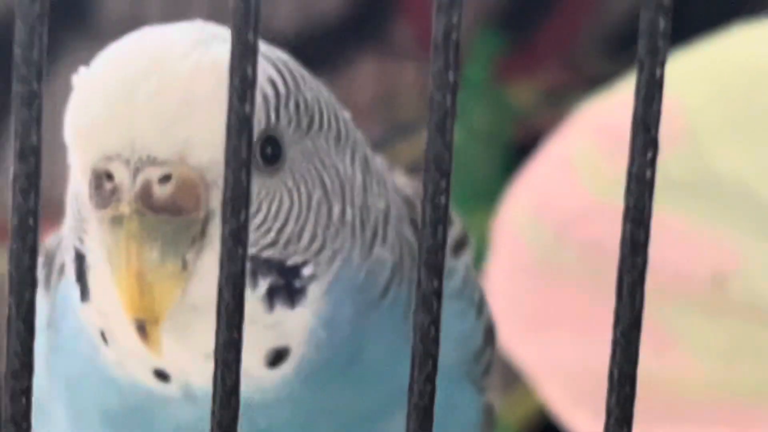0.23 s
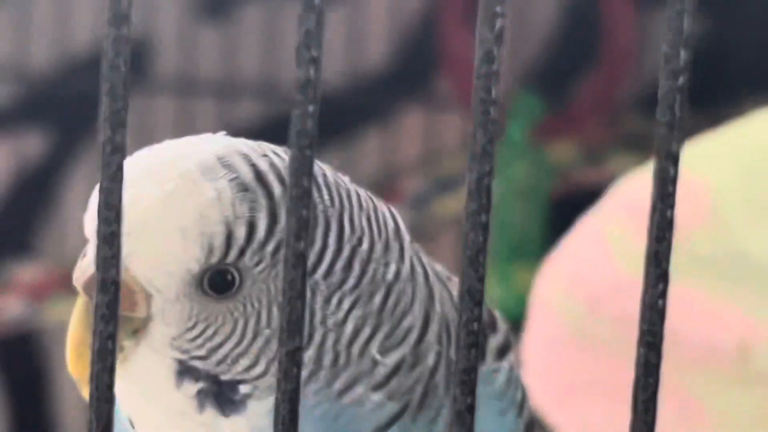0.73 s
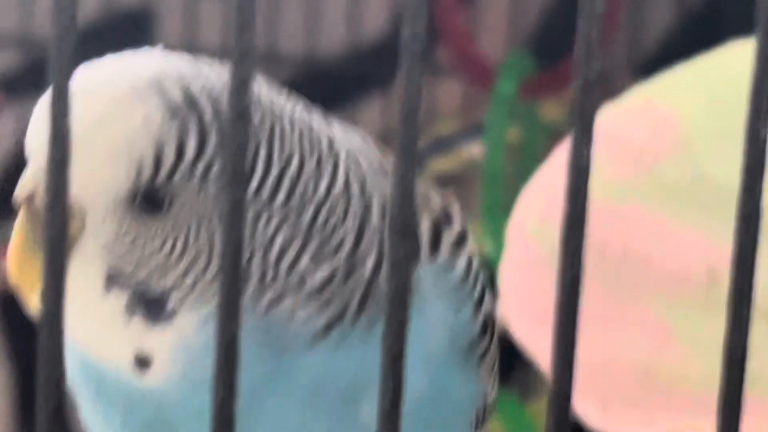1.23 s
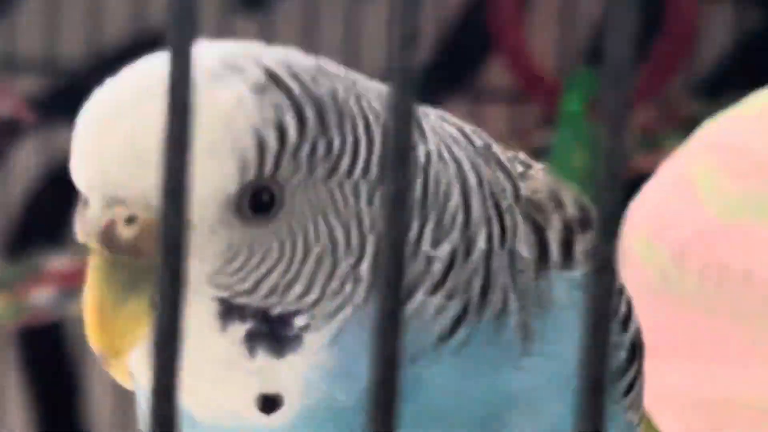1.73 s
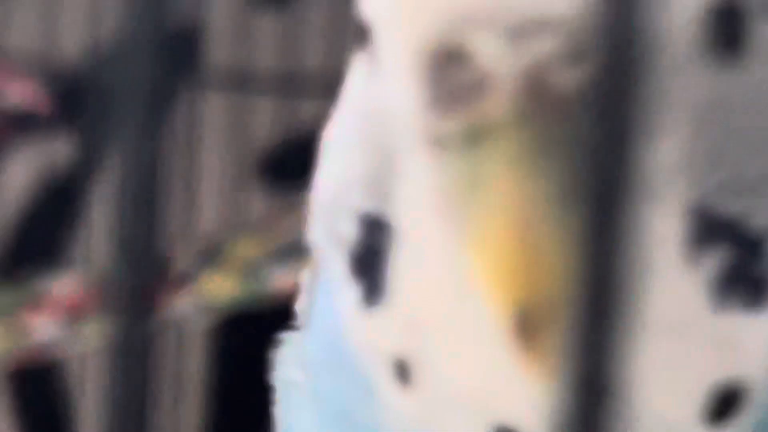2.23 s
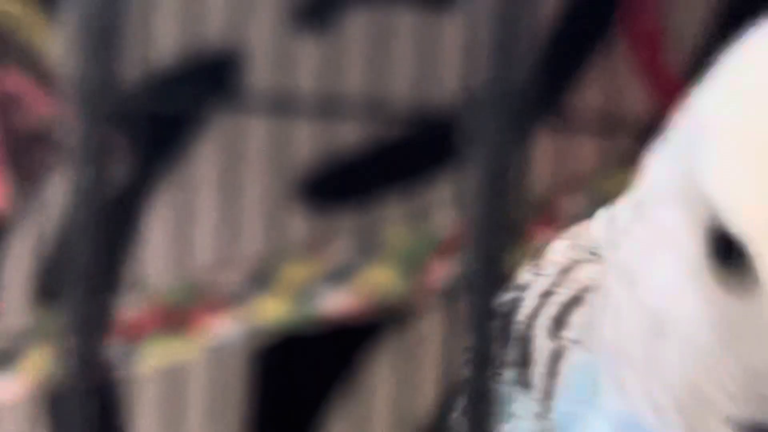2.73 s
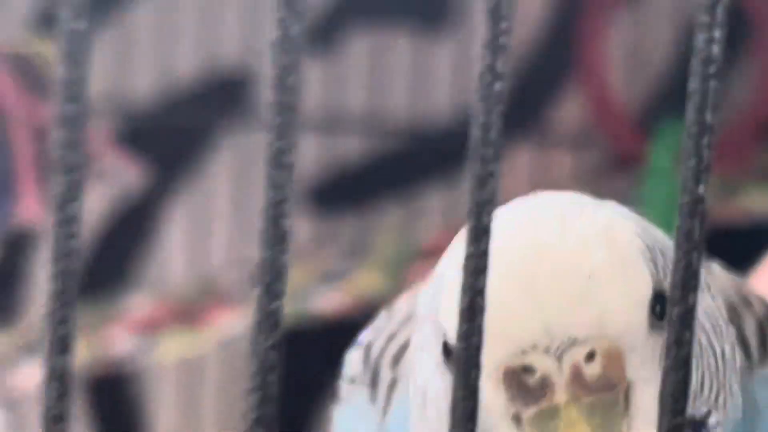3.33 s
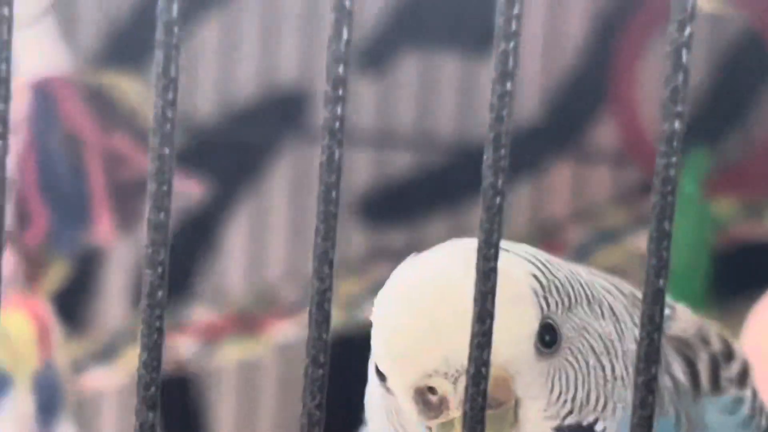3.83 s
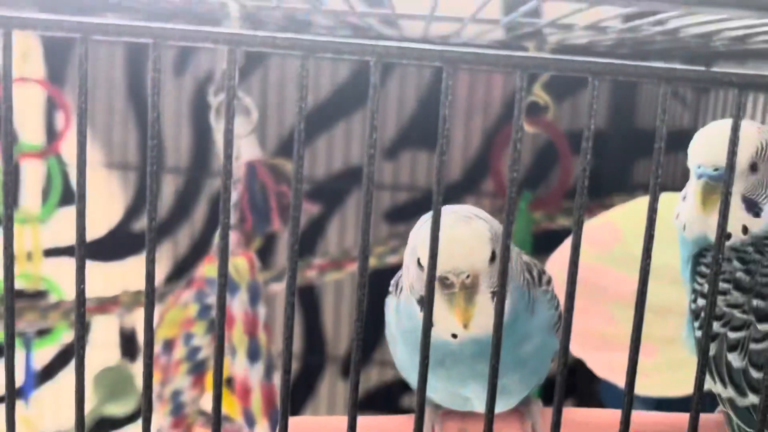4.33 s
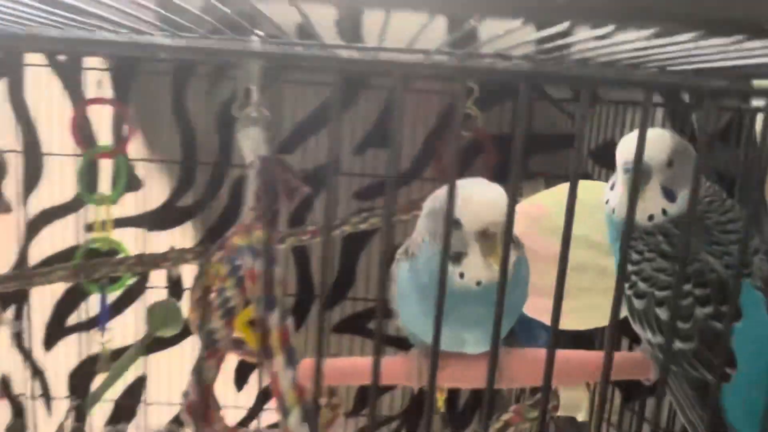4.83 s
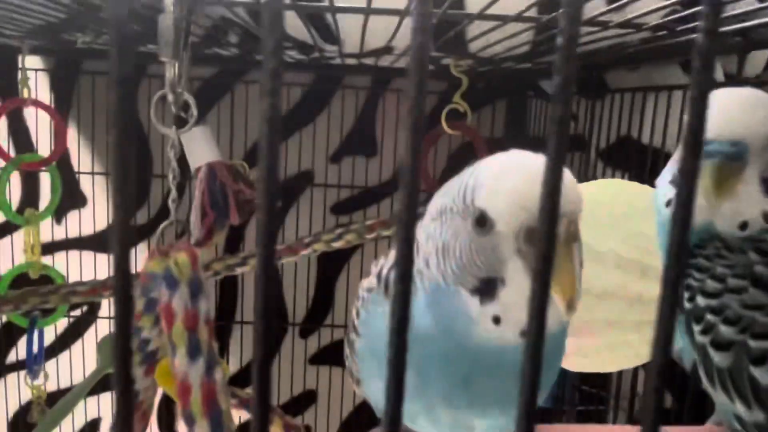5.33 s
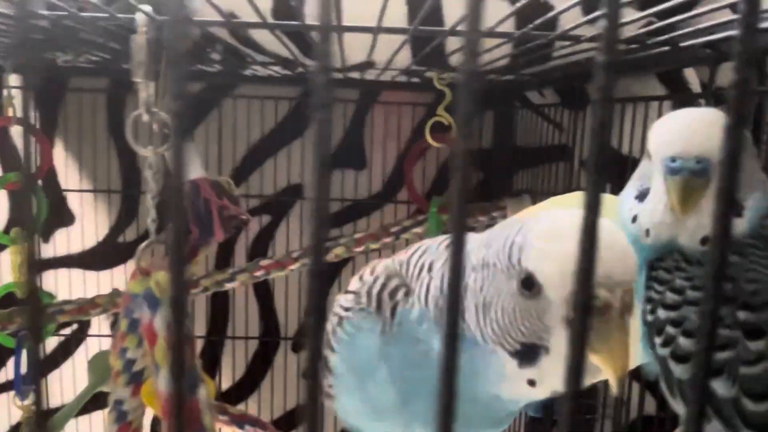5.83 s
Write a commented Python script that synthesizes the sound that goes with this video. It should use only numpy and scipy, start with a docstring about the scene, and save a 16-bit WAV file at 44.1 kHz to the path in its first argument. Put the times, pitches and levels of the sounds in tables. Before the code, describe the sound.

Close to a wire cage in a quiet room, one budgerigar gives loud, rapidly sliding chirps while another sounds fainter and more reverberant behind. The song sinks into low mutters, tiny croaks and beak clicks with a dull bump, then a second bright burst comes near four seconds. Sparse rustles, a faint squawk and a thin wire ring finish it. A nearby stereo microphone also catches low room rumble.

```python
"""A quiet room with a wire cage: two budgerigars warble, one right at the bars, one farther back. Their song is
a string of fast whistled glides, each bird one gliding tone with overtones, some of it fluttered into buzzes.
Pulses ringing the throat make soft croaks and beak clicks; noise makes raspy hisses. A few dull decaying thumps
sound and a wire rings faintly, over rustling and the room's low rumble. Cage and room reflect both birds, the
far one more strongly, into a pair of microphones."""
import sys
import numpy as np
from scipy import signal
from scipy.fft import rfft, irfft, next_fast_len
from scipy.io import wavfile
from scipy.ndimage import uniform_filter1d, map_coordinates

SR = 44100
rng = np.random.default_rng(int(sys.argv[2]) if len(sys.argv) > 2 else 0)


def int16_out(signal):
    """Quantize to a 16-bit WAV file."""
    q = np.round(np.clip(np.atleast_2d(signal).T, -1, 1) * 32767)
    wavfile.write(sys.argv[1], SR, q.astype(np.int16))


N = 268172
TIME = np.arange(N) / SR
SIZE = next_fast_len(N + SR)
FREQS = np.maximum(np.fft.rfftfreq(SIZE, 1 / SR), 1)


def from_db(db):
    """Decibels to gain."""
    return 10 ** (np.asarray(db) / 20)


def rms_one(x):
    """Scale to unit power."""
    return x / np.sqrt(np.mean(x ** 2) + 1e-20)


def at_hz(points, hz):
    """Read a table on a log-frequency axis."""
    table_hz, values = np.transpose(points)
    return np.interp(np.log(hz), np.log(table_hz), values)


def shaped(x, response):
    """Filter by a frequency response."""
    return irfft(rfft(x, SIZE) * response, SIZE)[..., :N]


def noise(colour):
    """Coloured noise of unit power."""
    return rms_one(shaped(rng.standard_normal(N), from_db(at_hz(colour, FREQS))))


def wobble(hz):
    """Random motion up to the given rate, spread 1."""
    return rms_one(shaped(rng.standard_normal(N), 1 / (1 + (FREQS / hz) ** 4)))


def span(start, end):
    """Samples of an event and its progress from 0 to 1."""
    first = int(start * SR)
    at = np.arange(first, min(max(int(end * SR), first + 20), N))
    return at, np.linspace(0, 1, len(at))


def soften(x, seconds):
    """Round the corners of a control by averaging twice."""
    size = max(int(seconds * SR), 1)
    return uniform_filter1d(uniform_filter1d(x, size), size)


# colour of the room's rumble: [f/Hz, level/dB]
RUMBLE_COLOUR = [(25, -5.5), (52, 1.5), (75, -4), (120, -11.5), (200, -13.5), (320, -17), (660, -26),
                 (1100, -34), (2200, -33.5), (4200, -55.5), (7000, -57.5), (10000, -58), (15500, -67)]
# likeness of the room noise at the two microphones: [f/Hz, likeness 0-1]
LIKENESS = [(40, 0.98), (125, 0.93), (300, .7), (1000, 0.8), (10000, 0.96)]


def room_noise(level_db, swell_db):
    """Low rumble of the home, slowly swelling, nearly the same on both sides in the bass."""
    alike = np.clip(at_hz(LIKENESS, FREQS), 0, 1)
    middle = noise(RUMBLE_COLOUR)
    side = shaped(noise(RUMBLE_COLOUR), np.sqrt((1 - alike) / (1 + alike)))
    gain = from_db(level_db + swell_db * wobble(1.3))
    return gain * (middle + side * np.array([[1], [-1]]))


# colour of the rustle: [f/Hz, level/dB]
RUSTLE_COLOUR = [(400, -13.5), (1100, -0.5), (2200, 2), (4000, 0.5), (5500, -4), (7500, -8), (10500, -13),
                 (14500, -25.5), (16000, -30.5)]
# stirs of feathers and feet over a faint steady rustle, levels before the grain: [t/s, peak level/dB]
STIRS = [(.02, -59.5), (.53, -68.5), (1.509, -67), (2.0, -67), (2.8, -64.5), (3.38, -63.5), (4.72, -66.5),
         (5.001, -51.5), (5.39, -67.5), (5.75, -54.5), (5.97, -80)]
STIR_RISE_DB_PER_S, STIR_FALL_DB_PER_S, RUSTLE_DB = 112.5, 125.5, -74.5


def rustle(grain_db):
    """Feathers and feet stir softly all the time, a grainy noise with now and then a swell."""
    gain = from_db(RUSTLE_DB)
    for s, peak_db in STIRS:
        drop_db = np.maximum(STIR_RISE_DB_PER_S * (s - TIME), STIR_FALL_DB_PER_S * (TIME - s))
        gain = gain + from_db(peak_db - drop_db)
    return gain * from_db(grain_db * wobble(60)) * noise(RUSTLE_COLOUR)


def flutter(rows):
    """Swing of the syrinx that chops a whistle into a buzz: its beat and its depth."""
    beat, depth = np.zeros((2, N))
    for start, end, per_s, amount in rows:
        at, _ = span(start, end)
        beat[at] = -np.cos(2 * np.pi * per_s * (TIME[at] - start))
        depth[at] = min(amount, 1)
    return soften(beat * depth, 0.00021), soften(depth, 0.00022)


# strength of the octave overtone, strong in low notes and faint in high ones: [pitch f/Hz, level/dB]
OCTAVE = [(780, 3.5), (1000, 0), (1250, -6.5), (1500, -14), (2000, -23.5), (2500, -29.5), (3000, -30),
          (4000, -26.5)]
# colour of the overtones, read relative to the octave: [f/Hz, level/dB]
OVERTONE_COLOUR = [(1500, 19.5), (2500, 10), (3200, -0.5), (4200, -13), (5500, -24), (7000, -29.5),
                   (8500, -27), (10500, -36), (14500, -36), (16000, -39)]
# colour of the breath let through by a rough voice: [f/Hz, level/dB]
AIR_COLOUR = [(400, -35), (1200, -23.5), (2200, 19.5), (4200, -10.5), (5400, -11), (8500, -19.5),
              (10500, -14.5), (14500, -7), (16000, -27.5)]
# unsteady push of air: its rate, its swing in level and in pitch (share)
PUSH_HZ, PUSH_DB, PUSH_BEND = 87, 1.36, .008
FULL_FALL_HZ = 1800   # below this pitch the higher overtones thin out less and less
BASE_ROUGH = 0.053    # added to the roughness of every note


def whistle(notes, squeezes, flutters, jitter, shimmer, rough_hz, air_db, ease_s, fall_db, bend_hz):
    """One syrinx runs through the notes; roughness shakes its pitch and strength and lets air through."""
    controls = np.zeros((4, N))
    gate, pitch, gain, rough = controls
    for at, note_hz, strength, roughness in notes:
        gate[at], pitch[at], gain[at] = 1, note_hz, strength
        rough[at] = np.clip(roughness, 0, 1)
    gate, pitch, gain, rough = (soften(c, ease_s) for c in controls)
    # dividing by the softened gate keeps pitch and roughness whole at the edges of a note
    pitch = np.maximum(pitch / np.maximum(gate, 1e-6), 300)
    rough = rough / np.maximum(gate, 1e-6) + BASE_ROUGH
    # a low pitch strengthens the octave; a squeeze sets it, strong in a screech, weak in a hollow note
    octave = at_hz(OCTAVE, pitch)
    for start, end, octave_db in squeezes:
        octave[span(start, end)[0]] = octave_db
    octave = soften(octave, ease_s)
    gain = gain / np.hypot(1, from_db(octave))
    # the push of air is never quite steady
    push = wobble(PUSH_HZ)
    gain = gain * from_db(PUSH_DB * push)
    pitch = pitch * (1 + PUSH_BEND * push)
    # each beat of the flutter raises strength and pitch together
    beat, depth = flutter(flutters)
    gain = gain * (1 + beat) / np.sqrt(1 + depth ** 2 / 2)
    gain = gain * (1 + np.tanh(shimmer * rough * wobble(rough_hz)))
    shaken_hz = pitch * (1 + jitter * rough * wobble(rough_hz)) + bend_hz * beat * depth
    phase = 2 * np.pi * np.cumsum(shaken_hz) / SR
    on = np.flatnonzero(gate > 1e-6)
    tone = np.zeros(N)
    tone[on] = np.sin(phase[on])
    # overtones grow together with the octave and are coloured by the throat
    fall_share = np.minimum(pitch[on] / FULL_FALL_HZ, 1)
    for k in range(2, 9):
        hz = k * pitch[on]
        colour_db = at_hz(OVERTONE_COLOUR, hz) - at_hz(OVERTONE_COLOUR, 2 * pitch[on])
        level_db = octave[on] + colour_db - fall_db * np.log2(k / 2) * fall_share
        tone[on] += from_db(level_db) * np.sin(k * phase[on]) * (hz < SR / 2)
    air = from_db(air_db) * rough * noise(AIR_COLOUR)
    return gain * (np.sqrt(2) * tone + air)


NOTE_EDGE = .45   # strength at the ends of a note
ROUGH_AT_HZ, ROUGH_GROWTH = 1500, 0.66   # pitch at which a note's roughness holds; lower notes are rougher


def note(start, end, first_hz, turn_hz, level_db, turn, roughness, lateness=1):
    """A short note swells and fades while its pitch runs along a parabola to a turning point."""
    at, u = span(start, end)
    pitch = turn_hz + (first_hz - turn_hz) * (1 - u / turn) ** 2
    swell = NOTE_EDGE + 0.54 * np.sin(np.pi * u ** lateness)
    slack_rough = roughness * (ROUGH_AT_HZ / turn_hz) ** ROUGH_GROWTH
    return at, pitch, from_db(level_db) * swell, slack_rough


# flutter of the syrinx at the bars: [start t/s, end t/s, beats per s, depth 0-1]
FLUTTERS = [(.3062, .316, 310, .92), (.3445, .358, 250, .7), (.752, .793, 330, .4), (.8555, .897, 166, .92),
            (1.03, 1.058, 330, .5), (3.931, 3.95, 430, .4), (4.198, 4.215, 140, .35)]
# squeezes of the throat that hold the overtone at one strength, high in a screech, low in a hollow note:
# [start t/s, end t/s, octave overtone level/dB]
SQUEEZES = [(0.413, 0.439, 3.5), (1.1, 1.122, 2), (4.175, 4.212, 7.5), (5.624, 5.8, -8.5)]


def near_bird():
    """All whistled notes of the bird at the bars, sung by one syrinx."""
    notes = near_chirps() + swoops() + near_slurs() + [squawk()]
    return whistle(notes, SQUEEZES, FLUTTERS, jitter=0.15, shimmer=0.16, rough_hz=503.0,
                   air_db=-6.5, ease_s=.0018, fall_db=9.5, bend_hz=694)


# slurs at the bars, notes that ease into a held pitch: [start t/s, end t/s, first f/Hz, held f/Hz, level/dB]
SLURS = [(.228, .256, 3109, 2650, -45.5), (1.025, 1.073, 2490, 3516, -27), (1.131, 1.166, 1547, 2100, -30),
         (1.178, 1.185, 3400, 2944, -37.5), (1.211, 1.217, 2233, 1078, -34),
         (1.283, 1.293, 4314, 2938, -44.5), (1.296, 1.31, 2508, 2332, -30.5),
         (2.386, 2.424, 1094, 1045, -41), (2.568, 2.583, 983, 1506, -33), (2.608, 2.615, 1011, 934, -35.5),
         (2.64, 2.668, 1239, 1032, -34.5), (2.757, 2.77, 1200, 2604, -34),
         (2.855, 2.872, 1112, 1448, -36.5), (2.898, 2.905, 2327, 2310, -31),
         (2.996, 3.031, 1123, 1381, -38), (3.12, 3.124, 1197, 1375, -43.5),
         (3.146, 3.182, 1192, 1449, -41.5), (3.264, 3.282, 924, 1270, -45),
         (3.756, 3.787, 2506, 3400, -34.5), (4.334, 4.392, 888, 968, -40),
         (4.966, 4.984, 1695, 1940, -29.5), (4.987, 4.991, 1970, 2613, -31),
         (5.573, 5.625, 773, 754, -45.5), (5.907, 5.956, 681, 727, -48), (5.96, 5.995, 735, 880, -53)]
SLUR_TURN, SLUR_ROUGH = 0.84, 0.19   # share of a slur before it levels off; roughness 0-1


def near_slurs():
    """Notes of the near bird whose pitch slides ever more slowly into a held one."""
    return [note(*row, SLUR_TURN, SLUR_ROUGH) for row in SLURS]


ROUGH_PER_OCTAVE_PER_S = .004   # a chirp gets rougher the faster its pitch slides


def chirp(points, roughness):
    """A whistle that bends smoothly through its points: samples, pitch, gain, roughness."""
    s, hz, level_db = np.transpose(points)
    at, _ = span(s[0], s[-1])
    place = np.interp(TIME[at], s, np.arange(len(s)))
    octaves = map_coordinates(np.log2(hz), [place], order=3, mode="nearest")
    slide = np.abs(np.gradient(octaves)) * SR
    gain = from_db(np.interp(TIME[at], s, level_db))
    return at, 2 ** octaves, gain, roughness + ROUGH_PER_OCTAVE_PER_S * slide


# loud gliding whistles at the bars, some of several syllables with near-silent dips between,
# each a list of points: [t/s, pitch f/Hz, level/dB]
CHIRPS = [
    [(.255, 2935, -35), (.28, 3373, -20), (.299, 2356, -18.5), (.304, 2480, -23.5), (.31, 2840, -17.5),
     (.319, 3950, -29), (.333, 3654, -21), (.339, 3042, -16.5), (.346, 2500, -24.5), (.358, 2448, -15.5),
     (.372, 1453, -35), (.381, 1905, -15.5), (.393, 2055, -16.5), (.409, 2070, -14.5), (.423, 1859, -13.5),
     (.435, 2230, -23)],
    [(.665, 4780, -44), (.677, 4200, -47.5), (.684, 3190, -34.5), (.691, 1864, -25.5), (.699, 1312, -59),
     (.705, 1792, -22.5), (.731, 3750, -39.5), (.742, 2640, -27.5), (.751, 2515, -28.5), (.772, 2330, -21),
     (.792, 2866, -30)],
    [(.858, 2731, -30), (.877, 3000, -16), (.897, 2893, -27)],
    [(.993, 3050, -35.5), (1.003, 2200, -28), (1.015, 1280, -45)],
    [(3.808, 4300, -42.5), (3.829, 4920, -47.5), (3.841, 2643, -21), (3.853, 3607, -44), (3.865, 1559, -29),
     (3.871, 1476, -48.5), (3.883, 2714, -38), (3.889, 2422, -26.5), (3.9, 2330, -30)],
    [(3.906, 2963, -32), (3.922, 3740, -35.5), (3.927, 4301, -26), (3.933, 4030, -21.5),
     (3.941, 3670, -25.5), (3.95, 3340, -28.5)],
    [(4.04, 2053, -25.5), (4.049, 2835, -27.5), (4.058, 2256, -33.5), (4.078, 1275, -32),
     (4.09, 1285, -38.5), (4.099, 2225, -26.5), (4.108, 3476, -41), (4.116, 2375, -17.5)],
    [(4.123, 1918, -28.5), (4.131, 1739, -31.5), (4.148, 2010, -30), (4.163, 2196, -24),
     (4.174, 1925, -26.5), (4.191, 1989, -16.5), (4.198, 1892, -20.5), (4.206, 2311, -13),
     (4.215, 2042, -29)],
]
CHIRP_ROUGH = 0.049   # roughness of a chirp where its pitch stands still


def near_chirps():
    """Loud gliding whistles of the near bird, some of several syllables with near-silent dips between."""
    return [chirp(points, CHIRP_ROUGH) for points in CHIRPS]


# chirps from the back of the cage, each a list of points: [t/s, pitch f/Hz, level/dB]
FAR_CHIRPS = [
    [(.9, 3532, -42.5), (.94, 3960, -44.5), (.958, 3100, -42), (.978, 1787, -37.5), (.986, 3294, -41.5),
     (1.01, 2322, -38.5), (1.055, 3251, -25.5), (1.072, 3563, -25), (1.08, 3473, -43), (1.12, 3450, -56)],
    [(4.337, 4071, -42), (4.345, 2996, -37.5), (4.353, 2100, -30.5), (4.376, 2176, -31.5),
     (4.385, 3435, -18.5), (4.394, 3701, -25.5), (4.407, 1768, -27.5), (4.435, 2049, -29.5),
     (4.46, 2209, -26.5), (4.472, 2193, -33.5)],
]
# slurs from the back: [start t/s, end t/s, first f/Hz, held f/Hz, level/dB]
FAR_SLURS = [(.255, .268, 2020, 1878, -33), (.31, .345, 2093, 2130, -30.5),
             (0.36, 0.392, 1901, 2037, -24.5), (4.991, 5.073, 2103, 1355, -51.5),
             (5.831, 5.891, 930, 1246, -59)]
# flutter of the syrinx at the back: [start t/s, end t/s, beats per s, depth 0-1]
FAR_FLUTTERS = [(4.352, 4.378, 200, 0.8), (4.393, 4.472, 210, 0.3)]
# squeezes of the throat at the back: [start t/s, end t/s, octave overtone level/dB]
FAR_SQUEEZES = [(0.35, 0.387, 10), (1.032, 1.074, -21.5), (4.348, 4.379, 9), (4.405, 4.471, 0)]
FAR_ROUGH = .35


def far_bird():
    """All whistled notes of the bird at the back, sung by one rougher syrinx."""
    notes = [chirp(points, FAR_ROUGH) for points in FAR_CHIRPS]
    notes += [note(*row, SLUR_TURN, FAR_ROUGH) for row in FAR_SLURS]
    return whistle(notes, FAR_SQUEEZES, FAR_FLUTTERS, jitter=0.091, shimmer=0.17, rough_hz=434,
                   air_db=-8.5, ease_s=0.0023, fall_db=4.5, bend_hz=250)


# colour of hisses and of the snap of a beak click: [f/Hz, level/dB]
HISS_COLOUR = [(300, -43), (1100, -10.5), (2000, 6), (3800, 5), (5500, -3), (7500, -6.5), (10500, -23),
               (14500, -25.5), (16000, -28.5)]
# rasping hisses: [start t/s, end t/s, level/dB, distance 0 at the bars to 1 at the back]
HISSES = [(0.402, 0.433, -27.5, .1), (0.766, 0.795, -48, .1), (0.858, 0.895, -28, .05),
          (1.433, 1.459, -29, 0.42), (2.381, 2.413, -42, 0.029), (3.589, 3.624, -41.5, .05),
          (4.16, 4.221, -34.5, 0.15), (4.316, 4.483, -47.5, 0.55), (5.565, 5.617, -49, 1),
          (5.892, 5.909, -41.5, 0.7)]


def hisses(grain_db):
    """Air forced through the throat: the near share, chopped by the flutter, and the far share."""
    gain = np.zeros((2, N))
    for start, end, level_db, distance in HISSES:
        at, u = span(start, end)
        distance = np.clip(distance, 0, 1)
        swell = np.sqrt(np.abs(np.sin(np.pi * u)))
        gain[:, at] += np.outer([1 - distance, distance], from_db(level_db) * swell)
    gain[0] *= 1 + flutter(FLUTTERS)[0]
    return gain * noise(HISS_COLOUR) * from_db(grain_db * wobble(400))


# swoops at the bars, soft notes that dive to a low pitch and curl up:
# [start t/s, end t/s, lowest f/Hz, level/dB]
SWOOPS = [(1.077, 1.118, 1339, -32.5), (1.187, 1.214, 2030, -32), (1.24, 1.27, 1095, -38.5),
          (1.338, 1.357, 2080, -30.5), (1.388, 1.418, 1034, -38.5), (1.425, 1.464, 1856, -33.5),
          (2.556, 2.567, 1300, -42), (2.584, 2.604, 826.3, -35.5), (2.691, 2.712, 762.5, -38.5),
          (2.731, 2.741, 1595, -34.5), (2.743, 2.758, 1002, -35), (2.838, 2.856, 875.6, -43),
          (2.879, 2.893, 1465, -38.5), (2.906, 2.93, 1039, -36.5), (3.069, 3.076, 1046, -46.5),
          (3.787, 3.8, 2051, -27.5)]
# depth of a dive to 2 kHz; higher notes dive deeper; share of the note before it turns
SWOOP_OCTAVES, SWOOP_GROWTH, SWOOP_TURN = .85, .6, .72
SWOOP_ROUGH = 0.14


def swoops():
    """Notes that dive from above; the higher one lies, the deeper it dives and the later it swells."""
    notes = []
    for start, end, low_hz, level_db in SWOOPS:
        height = (low_hz / 2000) ** SWOOP_GROWTH
        first_hz = low_hz * 2 ** (SWOOP_OCTAVES * height)
        notes.append(note(start, end, first_hz, low_hz, level_db, SWOOP_TURN, SWOOP_ROUGH,
                          lateness=1.1 * height))
    return notes


# resonances of throat and beak: [f/Hz, width f/Hz, level/dB]
THROAT = [(890, 1050, -0.5), (1580, 1124, 3.5), (1940, 213, 6), (2270, 360, -5), (2980, 1240, -10.5),
          (4750, 300, -27)]


def throat(pulses):
    """Pulses ring the resonances of throat and beak, two-pole filters of alternating sign."""
    out = 0
    for k, (hz, width, level_db) in enumerate(THROAT):
        r = np.exp(-np.pi * width / SR)
        poles = [1, -2 * r * np.cos(2 * np.pi * hz / SR), r * r]
        zeros = np.array([1, 0, -1]) * (1 - r * r) / 2
        out = out + (-1) ** k * from_db(level_db) * signal.lfilter(zeros, poles, pulses + 1e-18)
    return out


# uneven rasps, levels before the kind's own gain: [start t/s, end t/s, typical pulses per s, level/dB]
RASPS = [(1.214, 1.239, 810, -42.5), (1.365, 1.384, 730, -39), (2.552, 2.564, 650, -43.5),
         (2.672, 2.687, 790, -36), (2.796, 2.808, 490, -41), (2.841, 2.858, 480, -42.5),
         (2.937, 2.952, 650, -42.5), (3.081, 3.103, 850, -44.5), (3.229, 3.259, 500, -44.5),
         (3.624, 3.651, 260, -48), (4.71, 4.809, 253, -50), (4.832, 4.859, 286, -54.5),
         (5.115, 5.149, 395, -51)]
# even nasal notes, levels likewise: [start t/s, end t/s, typical pulses per s, level/dB]
NASALS = [(1.98, 1.989, 649, -44), (3.593, 3.623, 482.4, -33), (5.573, 5.627, 331.5, -44.5),
          (5.898, 5.93, 763, -51)]
RASP_UNEVEN, NASAL_UNEVEN = .43, 0.046   # random spread of the pulse spacing, as a natural logarithm


def croaks(rows, uneven, level_db, scatter_db):
    """The slack syrinx claps in slow pulses, even for a nasal note and uneven for a rasp."""
    out = np.zeros(N)
    for start, end, per_s, croak_db in rows:
        at, u = span(start, end)
        chance = rng.standard_normal((100, 2))   # spacing and strength of each pulse
        times = (np.cumsum(np.exp(uneven * chance[:, 0])) - .5) * SR / per_s
        inside = times < len(at)
        pulses = np.zeros(len(at) + SR // 100)   # 10 ms more for the ring to die
        pulses[times[inside].astype(int)] = from_db(scatter_db * uneven * chance[inside, 1])
        pulses[:len(at)] *= 1.6 + np.sin(np.pi * u)
        voice = rms_one(throat(pulses)) * np.sqrt(len(pulses) / len(at))
        out[at[0]:at[0] + len(voice)] += from_db(croak_db + level_db) * voice[:N - at[0]]
    return out


# beak clicks, strength before the ring and snap are weighted: [t/s, level/dB]
CLICKS = [(1.927, -21.5), (1.932, -21), (1.9489, -18.5), (2.360, -25), (2.526, -29.5), (2.531, -33),
          (2.725, -33), (4.956, -25.5), (5.562, -27.5), (5.881, -28), (5.904, -20.5)]


def beak_clicks(level_db, snap):
    """Each click is a sharp snap with a short ring of the mouth."""
    pulses = np.zeros(N)
    for s, click_db in CLICKS:
        pulses[int(s * SR)] = from_db(click_db)
    ring = from_db(level_db) * throat(pulses)
    return ring + snap * shaped(pulses, from_db(at_hz(HISS_COLOUR, FREQS)))


# dull low thumps: [t/s, level/dB at the start of the decay, f/Hz]
BUMPS = [(2.032, -32.5, 169), (3.661, -37.5, 160.3), (3.742, -35, 82.2), (4.945, -37, 190)]


def low_thumps(decay_s):
    """Each dull thump is a low sine that dies away exponentially."""
    out = np.zeros(N)
    for s, bump_db, hz in BUMPS:
        age = np.maximum(TIME - s, 0)
        out += from_db(bump_db) * np.exp(-age / decay_s) * np.sin(2 * np.pi * hz * age)
    return out


SQUAWK_START_S, SQUAWK_END_S, SQUAWK_HZ, SQUAWK_DB, SQUAWK_ROUGH = 5.628, 5.8, 954, -47.5, 0.21
WAVER_PER_S, WAVER_SHARE = 18.5, .085   # rate and pitch swing of the squawk


def squawk():
    """A low, breathy note of the near bird whose pitch wavers."""
    at, pitch, gain, rough = note(SQUAWK_START_S, SQUAWK_END_S, SQUAWK_HZ, SQUAWK_HZ, SQUAWK_DB,
                                  SLUR_TURN, SQUAWK_ROUGH)
    waver = np.cos(2 * np.pi * WAVER_PER_S * (TIME[at] - SQUAWK_START_S))
    return at, pitch * (1 - WAVER_SHARE * waver), gain, rough


# ringing wire: [t/s, level/dB]
WIRE = [(5.68, -100), (5.78, -77), (5.85, -63), (5.95, -71), (6.08, -77)]
WIRE_HZ = 6070


def wire_ring():
    """The thin ring of one wire, a steady sine that follows the levels."""
    level_db = np.interp(TIME, *np.transpose(WIRE), left=-200)
    return from_db(level_db) * np.sin(2 * np.pi * WIRE_HZ * TIME)


# colour of the reflections: [f/Hz, level/dB]
ECHO_COLOUR = [(200, -15.5), (1000, 4), (2100, 2), (2900, 3), (4200, 1.5), (5500, 5), (8000, -6),
               (15000, -6)]


def echoes(x, t60, delay_s, width):
    """Dense reflections that die away, partly alike at the two microphones."""
    age = TIME[:SR // 2]
    mid, side = rng.standard_normal((2, len(age))) * from_db(-60 * age / t60) * (age > delay_s)
    tails = mid + width * side * np.array([[1], [-1]])
    tails /= np.sqrt(np.sum(tails ** 2) / 2)
    return shaped(x, rfft(tails, SIZE) * from_db(at_hz(ECHO_COLOUR, FREQS)))


# left minus right microphone: [f/Hz, level/dB]
PORT_BALANCE = [(300, 0), (700, -.5), (1100, -2.3), (2000, -3.8), (2600, -1), (3600, 0), (15000, 0)]
# how far the left microphone leads: [f/Hz, phase/radians]
PORT_PHASE = [(100, 0), (2000, -.1), (2900, .5), (4800, .25), (5700, -.8), (6700, -.95), (7500, -2.2),
              (8300, -3.14), (9100, -3.8), (10100, -4.6), (10700, -5.9), (12700, -6.4), (14000, -8.1),
              (15000, -9.2)]


def microphone_pair(sound):
    """The two ports hear the treble out of step and at slightly different levels."""
    sides = np.array([[.5], [-.5]])
    balance = from_db(sides * at_hz(PORT_BALANCE, FREQS))
    return shaped(sound, balance * np.exp(1j * sides * at_hz(PORT_PHASE, FREQS)))


# reflections against the direct sound, before their colour
CAGE_DB, FAR_CAGE_DB, ROOM_DB, FAR_ROOM_DB = -12.5, -8, -20.5, -8


def scene():
    """Both birds, their reflections from cage and room, and the background."""
    near_hiss, far_hiss = hisses(grain_db=0.0)
    rasps = croaks(RASPS, RASP_UNEVEN, level_db=-4.0, scatter_db=5.5)
    nasals = croaks(NASALS, NASAL_UNEVEN, level_db=-5.0, scatter_db=16)
    near = near_bird() + near_hiss + rasps + nasals + beak_clicks(level_db=17.5, snap=0.93)
    far = far_bird() + far_hiss + rustle(grain_db=2.0)
    # the farther bird comes with much stronger reflections
    to_cage = from_db(CAGE_DB) * near + from_db(FAR_CAGE_DB) * far
    to_room = from_db(ROOM_DB) * near + from_db(FAR_ROOM_DB) * far
    in_cage = echoes(to_cage, t60=0.067, delay_s=0.0017, width=.8)
    in_room = echoes(to_room, t60=0.31, delay_s=.008, width=.8)
    sound = near + far + in_cage + in_room + room_noise(level_db=-52.69, swell_db=2.0)
    # thumps and wire reach both microphones alike
    return microphone_pair(sound) + low_thumps(decay_s=0.0068) + wire_ring()


MIC_LOW_CUT_HZ, CUTOFF_HZ = 43, 15500


def record(dry):
    """The microphone loses the deepest bass; the top is cut steeply."""
    low_cut = 1 / np.sqrt(1 + (MIC_LOW_CUT_HZ / FREQS) ** 12)
    high_cut = 1 / np.sqrt(1 + (FREQS / CUTOFF_HZ) ** 240)
    return shaped(dry, low_cut * high_cut)


dry = scene()
out = record(dry)
int16_out(out)
```